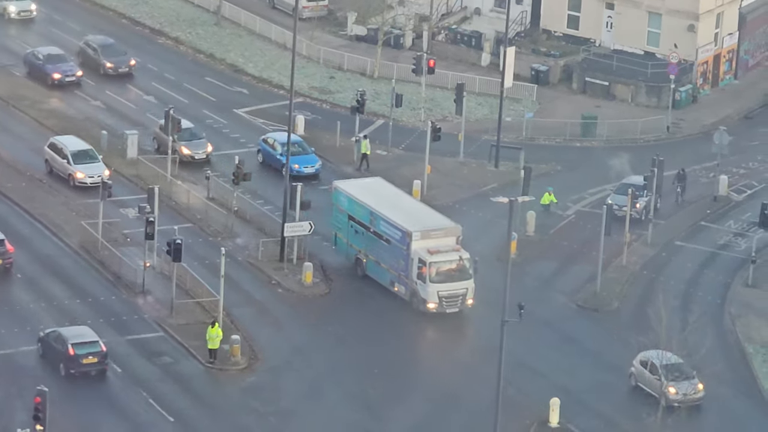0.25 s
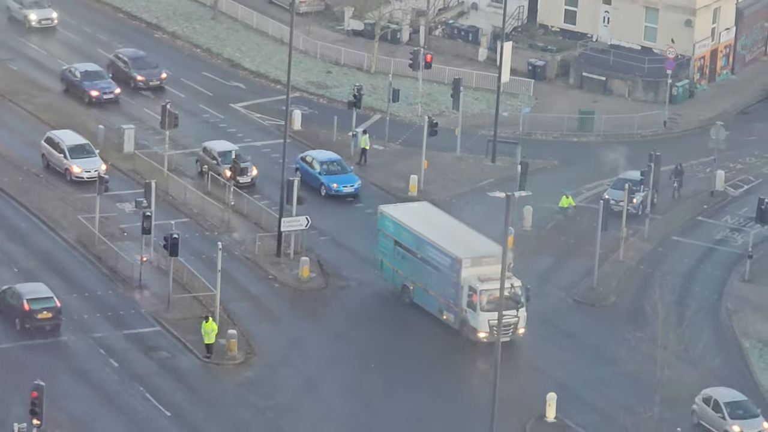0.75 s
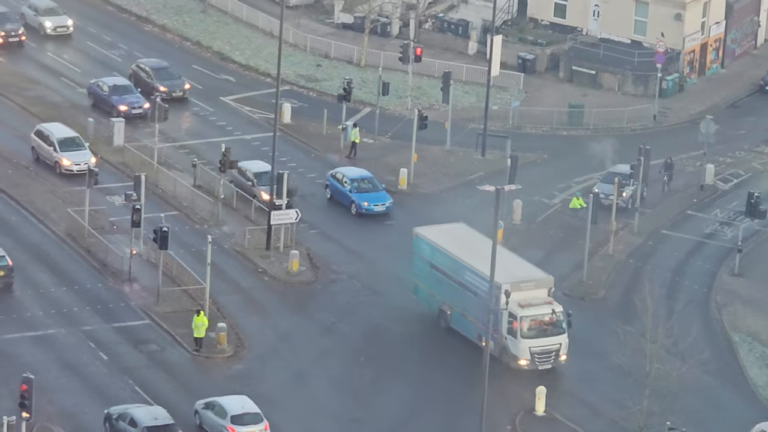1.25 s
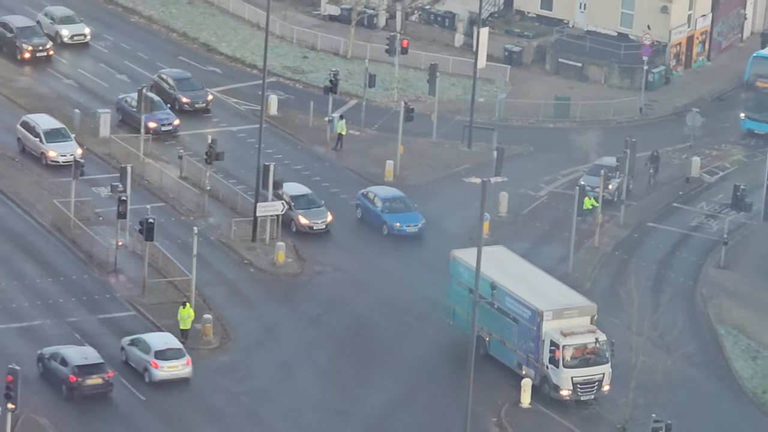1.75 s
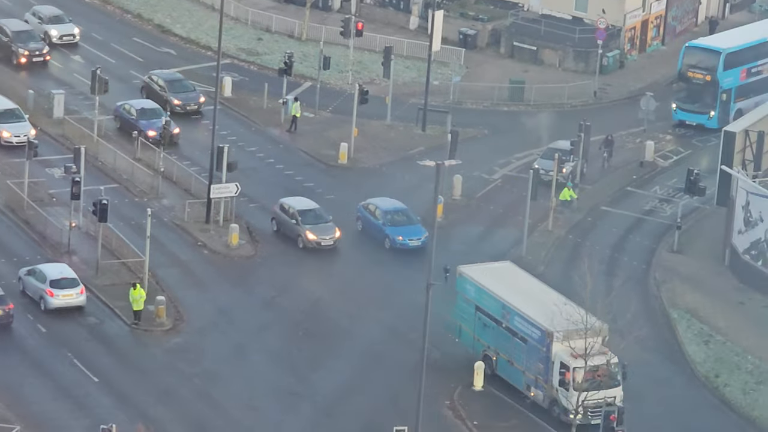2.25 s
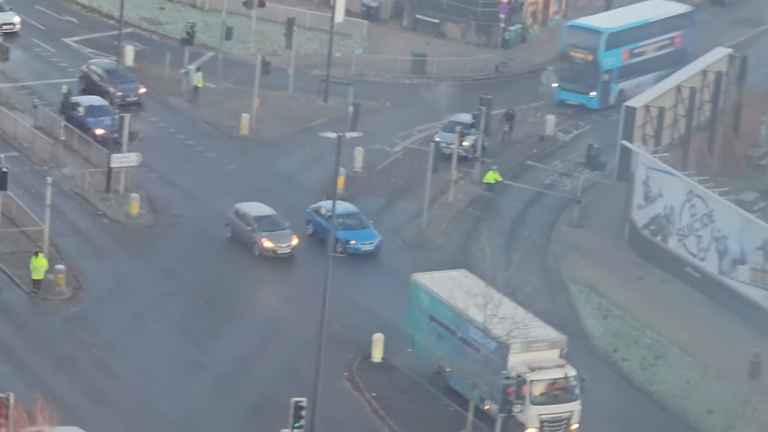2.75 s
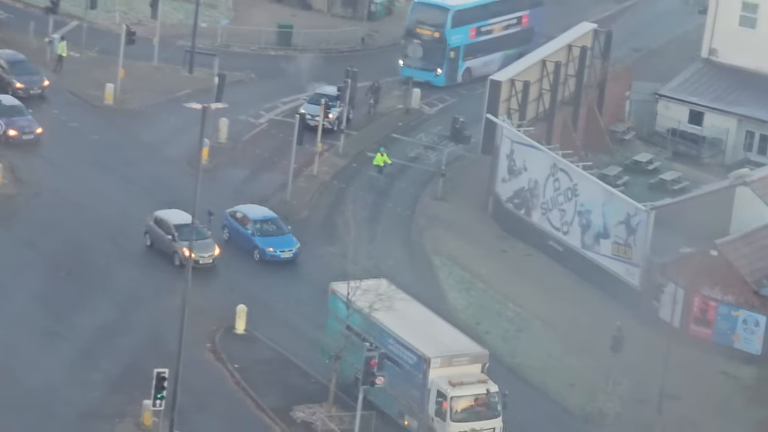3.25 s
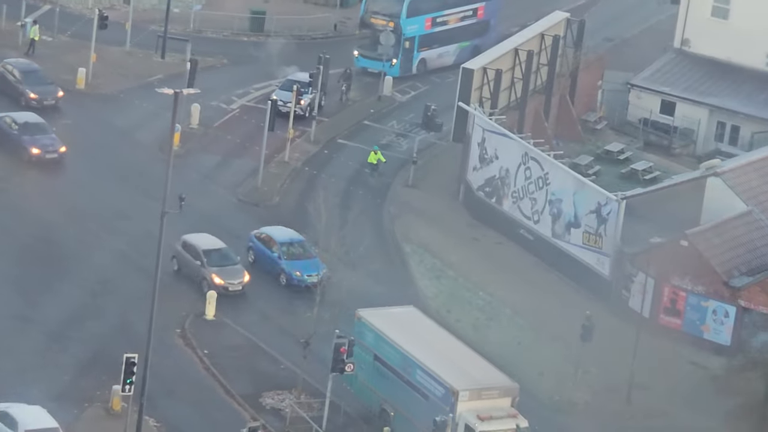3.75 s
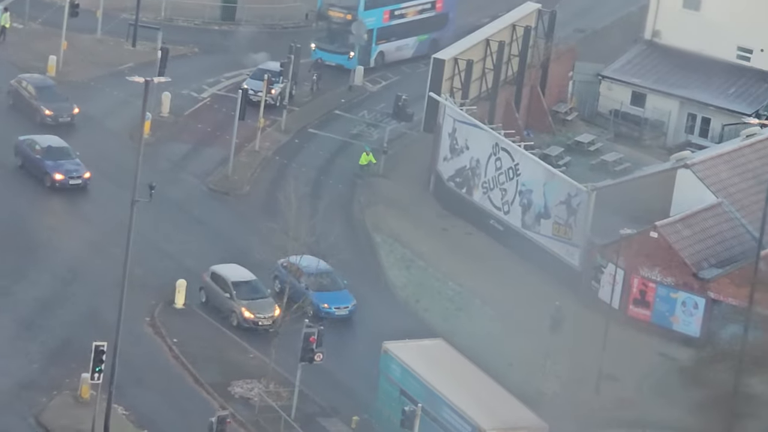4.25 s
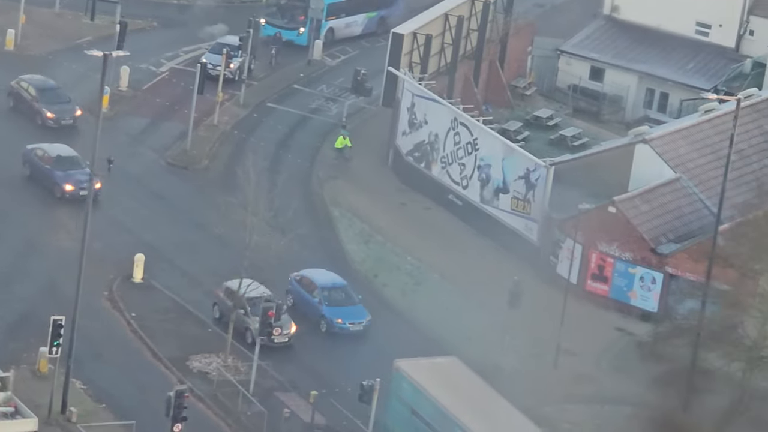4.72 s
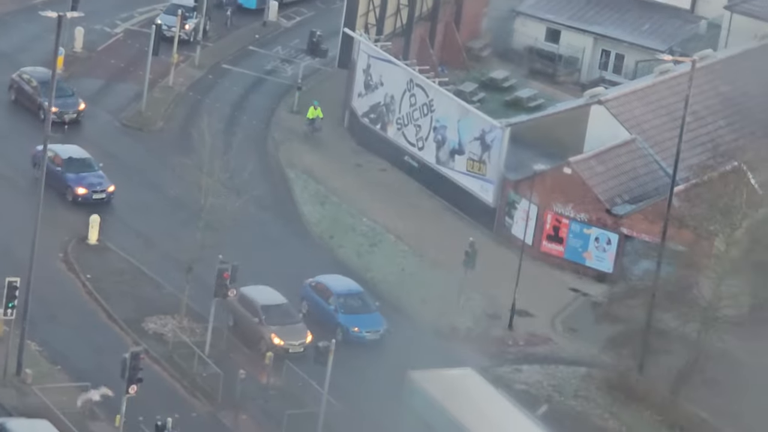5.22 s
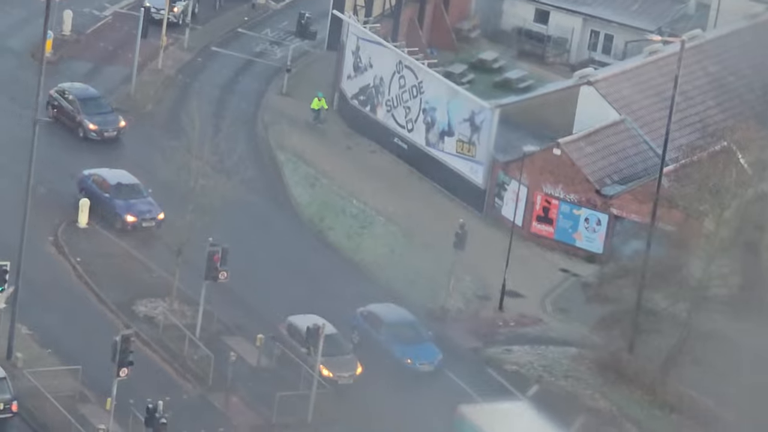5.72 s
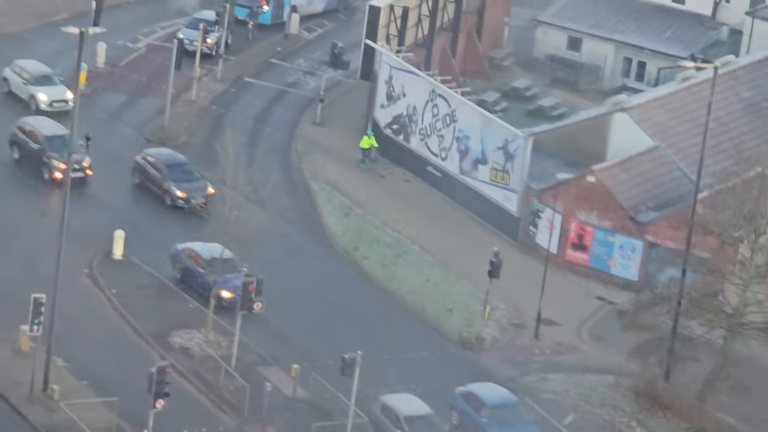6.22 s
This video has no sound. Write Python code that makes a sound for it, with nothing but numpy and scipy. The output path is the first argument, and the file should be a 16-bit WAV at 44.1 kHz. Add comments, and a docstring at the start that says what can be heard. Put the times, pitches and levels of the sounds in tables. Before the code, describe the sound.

Distant traffic heard from high up: lorry and car engines throb low beneath muffled road roar, with faint brake squeaks and tiny bird chirps.

```python
"""A deep rumble of beating diesels under a steady, dull tyre roar: a busy road junction on a damp day.
Two microphones hear it from high up and some way off; one engine swells to a drone near the end.
Engines are sums of sines on wandering firing rates; roar, rumble and hiss are shaped noise.
Far above the roar a brake squeals thinly and a small bird chirps, both as gliding or wavering sines
with echoes from the house fronts."""
import sys
import numpy as np
from scipy import signal
from scipy.fft import rfft, irfft
from scipy.io import wavfile
from scipy.ndimage import uniform_filter1d

SR = 44100
rng = np.random.default_rng(int(sys.argv[2]) if len(sys.argv) > 2 else 0)


def transcribe(u):
    """Save the signal u as a 16-bit wav file named by the first command-line argument.

    u: samples, shape (n,) or (channels, n), limited to [-1, 1]; the rate is SR.
    q: integer samples, one column per channel.
    """
    v = np.clip(np.atleast_2d(u).T, -1, 1)
    q = np.round(v * 32767).astype(np.int16)
    wavfile.write(sys.argv[1], SR, q)


N = 285768

# A diesel crossing the junction: (time [s], firing rate before wander [Hz])
DIESEL_FIRING = [(0, 45.6), (.45, 45.2), (.85, 43.4), (1.15, 45.14), (2.2, 44.32), (2.7, 45.69),
                 (3.7, 45.93), (4.2, 48.23), (4.9, 47.1), (5.6, 44.07), (6.48, 44.07)]
# Its exhaust note: (time [s], level [dB])
DIESEL_EXHAUST = [(0, -29), (.17, -22.5), (.3, -29), (.39, -21), (.48, -23), (.55, -40), (.64, -21.5),
                  (.7, -44), (.76, -24), (.87, -19.5), (.97, -42), (1.04, -23), (1.12, -19), (1.34, -42),
                  (1.43, -22), (1.52, -30), (1.6, -34), (1.66, -21), (1.75, -27.5), (1.85, -42),
                  (1.93, -27), (2.02, -39), (2.09, -20.5), (2.22, -22.5), (2.35, -31), (2.4, -20.5),
                  (2.46, -36), (2.55, -23.5), (2.64, -20), (2.86, -28), (2.93, -32), (3.04, -25.5),
                  (3.17, -25), (3.3, -34), (3.39, -25.5), (3.44, -49), (3.5, -22), (3.62, -26.5),
                  (3.82, -22.5), (3.89, -34), (4.0, -29.5), (4.06, -22.5), (4.12, -38), (4.21, -28),
                  (4.3, -51), (4.37, -29), (4.64, -29), (4.77, -42), (4.97, -25.5), (5.03, -52.5)]
# A second diesel runs a little slower and beats against it
RIVAL_DB, BEAT_HZ, BEAT_WANDER_HZ = -45, 2.9, 1.41

# The lorry gathers speed, then lifts off: (time [s], firing rate before wander [Hz], relative level [dB])
LORRY_REVS = [(0, 37.16, 3), (.6, 37.33, 0.5), (1.5, 38.29, -1.5), (2.2, 39.57, -1.5), (2.6, 41.58, -0.5),
              (3.3, 42.1, -7), (3.9, 42.97, -6), (4.2, 42.15, -9), (5, 39.57, -9), (6.48, 38.8, -6.5)]
# The lorry's engine orders: (multiple of the firing rate [-], relative level [dB])
LORRY_ORDERS = [(4, -50), (6, -43), (7, -42), (8, -53.5), (12, -49.5), (13, -48), (14, -47), (16, -47),
                (18, -54), (20, -51), (21, -48.5), (31, -52.5), (33, -50.5), (35, -54), (36, -55),
                (49, -60)]
# Its exhaust booms in uneven surges at twice the firing rate: (time [s], relative level [dB])
LORRY_BOOM = [(0, -27), (.15, -35), (.26, -23), (.34, -32), (.42, -24), (.5, -14), (.57, -29), (.62, -34),
              (.7, -21), (.79, -24), (.9, -32), (.98, -38), (1.1, -22), (1.26, -30.5), (1.42, -25),
              (1.56, -25.5), (1.68, -33), (1.8, -40), (1.89, -24.5), (2.17, -40), (2.26, -19), (2.38, -42),
              (2.5, -43), (2.59, -22), (2.7, -28), (2.78, -37), (2.85, -26), (2.93, -36), (3.0, -26),
              (3.11, -31), (3.3, -40), (5, -42), (6.48, -37)]

# Rumble of the other engines: (time [s], relative level [dB])
ENGINE_RUMBLE = [(0, -29), (.19, -33), (.26, -26), (.33, -31.5), (.5, -24), (.6, -37), (.7, -27.5),
                 (.84, -27.5), (.96, -36), (1.1, -27), (1.2, -35), (1.54, -30.5), (1.79, -35), (1.9, -31),
                 (2.15, -42), (2.28, -26), (2.45, -42), (2.58, -27), (2.8, -30), (2.92, -33), (3.0, -26),
                 (3.15, -32.5), (3.24, -27.5), (3.45, -33.5), (3.68, -32), (3.82, -24), (3.89, -32),
                 (4.25, -35), (4.64, -27.5), (4.75, -36), (4.88, -29), (5.03, -35.5), (5.09, -26.5),
                 (5.2, -32.5), (6.48, -34.5)]
# Drone of engine bodies: (time [s], level [dB])
BODY_DRONE = [(0, -32), (1.1, -33.5), (1.8, -33.5), (2.55, -33), (2.85, -37.5), (3.35, -32), (3.7, -35.5),
              (4.05, -34), (4.7, -37.5), (5.2, -34), (6.0, -33.5), (6.48, -36.5)]
# An engine held at higher revs: (time [s], relative level [dB])
ENGINE_HUM = [(0, -42), (.23, -30.5), (.33, -39), (.49, -36), (.6, -33), (.75, -33), (.9, -32.5),
              (1.0, -43), (1.14, -40), (1.23, -23.5), (1.34, -47), (1.57, -30.5), (1.75, -51), (2.2, -56),
              (2.34, -38), (2.45, -37), (2.62, -28.5), (2.72, -42), (3.0, -54), (3.15, -32), (3.3, -44),
              (3.42, -40), (3.62, -32.5), (3.76, -48), (3.9, -34), (4.07, -29.5), (4.26, -40),
              (4.52, -33.5), (4.82, -39.5), (5.16, -36.5), (5.34, -45), (5.48, -37), (5.7, -48),
              (6.07, -33), (6.48, -53)]
HUM_HZ = 124.5  # centre of its wander

# Noise spectrum of the engine rumble: (frequency [Hz], relative density [dB per Hz])
RUMBLE_SPECTRUM = [(12, -35.5), (22, -21), (32, -2.5), (45, -10), (60, 2.5), (76, 0.5), (90, -4.5),
                   (104, -7.5), (125, -18), (170, -34)]
# Noise spectrum of the engine drone: (frequency [Hz], relative density [dB per Hz])
DRONE_SPECTRUM = [(85, -13), (115, -1.5), (135, 2.5), (160, -3.5), (176, -9), (200, -0.5), (220, -3),
                  (240, 1), (256, 1), (275, 2.5), (300, -3), (325, -5.5), (350, -17), (450, -30)]
# Noise spectrum of the tyre roar: (frequency [Hz], relative density [dB per Hz])
ROAR_SPECTRUM = [(200, -19.5), (340, -10), (420, -5), (465, 0), (560, 2), (800, -1), (920, -3), (1200, -1),
                 (1400, -1), (1520, -4.5), (1750, -9), (2330, -15), (2450, -26), (3400, -50)]
# Noise spectrum of the tread hiss: (frequency [Hz], relative density [dB per Hz])
TREAD_SPECTRUM = [(1900, -14.5), (2300, 0.5), (2450, 5.5), (2750, 4), (3150, -4), (3600, -3.5),
                  (4100, -7.5), (4650, -9.5), (4850, -21), (5600, -41.5)]
# Noise spectrum of the faint high hiss: (frequency [Hz], relative density [dB per Hz])
HISS_SPECTRUM = [(3500, -7.5), (5000, 6), (5700, 2.5), (6600, 1), (8300, -2.5), (9200, -1.5), (10200, -8.5),
                 (11600, -2.5), (12600, -8.5), (15500, -5)]
# Noise spectrum of the soft rustles: (frequency [Hz], relative density [dB per Hz])
RUSTLE_SPECTRUM = [(4000, -5), (6500, 2.5), (9000, -5), (10500, -6), (12000, 0), (14500, -4), (15500, -12)]

# Reflections from the buildings colour the noise: (frequency [Hz], width [Hz], boost or cut [dB])
BUILDING_COLOUR = [(468, 17, 1.5), (495, 16, -2.5), (593, 49, -6), (813, 65, 2), (1106, 46, -4),
                   (1137, 50, 1.5), (1292, 43, -3.5), (1348, 85, 2.5), (1830, 61, -1), (1947, 127, 5.8),
                   (2500, 55, 1.5), (2940, 89, 2.5), (3230, 140, -1.5), (3600, 130, 3), (4520, 45, 3.5)]
# How alike the two microphones hear the street: (frequency [Hz], left-right correlation [-1 to 1])
MIC_LIKENESS = [(30, 0.99), (130, 0.94), (280, 0.99), (420, 0.83), (700, 0.71), (950, 0.42), (1200, 0.26),
                (1400, 0.22), (1560, -0.4), (1750, 0.28), (1950, 0.65), (2300, 0.42), (2700, .2),
                (3300, -0.026)]
# Lean of the street to one side: (frequency [Hz], left minus right level [dB])
STREET_LEAN = [(50, 2.5), (130, -0.5), (270, 0.1), (420, 0), (560, 3.5), (750, 1), (1200, 1.8), (1550, 2.5),
               (1950, 2.5), (2300, 1.2), (3800, 1.5), (4700, 3), (8000, -0.5)]
# Echoes off the road and passing bodywork: (delay before sway [ms], level [dB])
ECHO_PATHS = [(2.6, -13), (5.3, -12), (8.9, -15)]

# Tyre roar and tread hiss: level at the start before surges, then a slow fall as the traffic draws away
ROAR_DB, ROAR_FALL_DB_PER_S = -31.0, 0.19
TREAD_DB, TREAD_FALL_DB_PER_S = -54.5, 0.19
# The roar swells gently as the nearest vehicles pass: moment of the peak, spread, rise
PASS_S, PASS_LENGTH_S, PASS_RISE_DB = 2.44, 0.75, 0.84

# Faint high hiss: (time [s], level [dB])
HISS_LEVEL = [(0, -75), (2.6, -73), (4.6, -76.5), (6.48, -74.5)]
# Soft rustles: (start [s], length [s], peak level [dB])
RUSTLE_TIMES = [(.88, 0.13, -70), (1.14, .05, -75), (1.23, 0.07, -71), (1.437, 0.075, -71.5),
                (2.567, 0.068, -74), (6.145, .03, -75)]

# Brake squeal: (start [s], length [s], level before flicker [dB], pitch [Hz], waver [Hz])
BRAKE_SQUEALS = [(0, .25, -79, 9420, 75), (0.347, 0.11, -68.5, 9440, 60), (0.515, 0.14, -69.5, 9440, 60),
                 (0.82, 0.29, -72.5, 9400, 75.63), (1.091, .16, -79, 9400, 149),
                 (2.16, 0.56, -84, 9150, 380), (3.178, 0.13, -66.5, 9400, 95),
                 (3.297, 0.14, -72, 9500, 125), (4.294, 0.08, -80, 9520, 75)]
# Bird chirps: (start [s], length [s], start pitch [Hz], middle pitch [Hz], end pitch [Hz],
# peak level before flutter [dB], warble [share of pitch], loudest moment [share of length])
BIRD_CHIRPS = [(0.055, .04, 6600, 6520, 6450, -75, .002, .3),
               (.475, 0.051, 6600, 6500, 6480, -70, .002, .6),
               (0.905, 0.14, 7240, 6700, 6700, -64, 0.007, .85),
               (1.088, 0.043, 7000, 7350, 7200, -69, .012, .5),
               (1.105, 0.1, 7000, 6430, 6500, -61.5, 0.03, 0.72),
               (1.245, .04, 6900, 7350, 7050, -67, .018, .5),
               (1.28, 0.065, 7100, 6900, 6650, -66, .012, .8),
               (1.355, 0.065, 11600, 11700, 11850, -71, .006, .6),
               (2.88, 0.23, 5600, 4830, 4720, -63.5, 0.015, 0.52),
               (3.185, 0.15, 5700, 4900, 4200, -60.5, .02, 0.68),
               (3.496, 0.075, 4840, 4540, 4425, -51.5, 0.012, .3),
               (5.755, 0.088, 8267, 7610, 7400, -61.5, 0.0056, 0.82),
               (5.92, 0.092, 8000, 6700, 6100, -63.5, 0.13, 0.98),
               (6.254, 0.082, 7900, 6900, 6200, -66.5, 0.13, .68),
               (6.433, 0.052, 4300, 4570, 4580, -56, 0.0055, 0.54)]
BIRD_FLUTTER_DB = 4.0

# A heavy diesel opens up, holds, then eases off while its revs creep up
PULL_START_S, PULL_ATTACK_S, PULL_HOLD_S = 5.03, 0.095, 0.644
PULL_DB, PULL_EASE_DB_PER_S = -18.5, 7.5
PULL_HZ, PULL_RISE_HZ_PER_S = 47.5, 0.3
# As it eases it throbs against a neighbour: beat rate, depth (share), time to build up
THROB_HZ, THROB_DEPTH, THROB_BUILD_S = 4.89, 0.66, 0.08

CUTOFF_HZ = 15700


def from_db(db):
    """Turn decibels into gain."""
    return 10 ** (np.asarray(db) / 20)


def rms_one(x):
    """Scale to unit power."""
    return x / np.sqrt(np.mean(x ** 2) + 1e-20)


def in_time(rows):
    """Draw each column of a time curve at every sample."""
    times, *columns = np.transpose(rows)
    return [np.interp(np.arange(N) / SR, times, column) for column in columns]


def at_hz(points, hz):
    """Read a table on a log-frequency axis."""
    table_hz, value = np.transpose(points)
    return np.interp(np.log(hz + 1e-6), np.log(table_hz), value)


def drift(bandwidth_hz):
    """Low-passed chance of unit power, computed at every 40th sample and joined by straight lines."""
    step = 40
    pole = np.exp(-2 * np.pi * bandwidth_hz * step / SR)
    chance = rng.standard_normal(N // step + 2002)
    slow = signal.lfilter([1], [1, -2 * pole, pole * pole], chance)[2000:]  # drop the settling
    return np.interp(np.arange(N) / step, np.arange(len(slow)), rms_one(slow))


def turn(hz):
    """Running phase of a changing frequency."""
    return 2 * np.pi * np.cumsum(hz) / SR


def panned(x, lean_db):
    """Place a sound across the two microphones by level; a positive lean is to the left."""
    return x * from_db(np.array([[1], [-1]]) * lean_db / 2)


def swell(start_s, length_s, db):
    """A half-sine rise and fall of gain."""
    along = np.clip((np.arange(N) / SR - start_s) / length_s, 0, 1)
    return from_db(db) * np.sin(np.pi * along)


def street_noise(spectrum, lag_ms=0.099):
    """Noise from a wide street at two microphones, their likeness varying with frequency."""
    hz = np.arange(N // 2 + 1) * SR / N
    colour_db = sum(db * np.exp(-2 * ((hz - f) / width) ** 2) for f, width, db in BUILDING_COLOUR)
    level_db = at_hz(spectrum, hz) + colour_db
    low_hz, high_hz = spectrum[0][0], spectrum[-1][0]
    skirts = 1 / (1 + (hz / high_hz) ** 12) / (1 + (low_hz / (hz + 1)) ** 6)

    # Shared and opposed noise are mixed to give the wanted correlation
    alike = np.clip(at_hz(MIC_LIKENESS, hz), -.99, .99)
    mid, side = rfft(rng.standard_normal((2, N)))
    pair = np.sqrt(1 + alike) * mid + np.sqrt(1 - alike) * side * [[1], [-1]]
    pair = panned(pair, at_hz(STREET_LEAN, hz))

    # The left microphone hears the bass slightly earlier
    lead_s = lag_ms / 1000 / (1 + (hz / 900) ** 4)
    pair[0] *= np.exp(2j * np.pi * hz * lead_s)
    out = irfft(pair * from_db(level_db) * skirts, N)
    return out / np.std(out.mean(axis=0))


def evened(x, window_s):
    """Hold a noise at a steady level, so that its swells come from the traffic."""
    power = uniform_filter1d(x.mean(axis=0) ** 2, max(int(window_s * SR), 2))
    return x / np.sqrt(np.abs(power) + 1e-9)


def shifting_echoes(x, sway_ms=0.611, sway_bandwidth_hz=1.11):
    """Vehicles move, so echo paths lengthen and shorten and ripples wander through the noise."""
    n, out = np.arange(N), x
    for delay_ms, db in ECHO_PATHS:
        then = n - (delay_ms + sway_ms * drift(sway_bandwidth_hz)) * SR / 1000
        echo = np.array([np.interp(then, n, ear, left=0, right=0) for ear in x])
        out = out + from_db(db) * echo
    return out / np.std(out.mean(axis=0))


def receding(start_db, fall_db_per_s):
    """Gain of a source that draws steadily away."""
    return from_db(start_db - fall_db_per_s * np.arange(N) / SR)


def diesel(wander_hz=1.74, second_db=-24):
    """The firing note and its second harmonic waver and beat against a second exhaust."""
    (firing_hz,), (exhaust_db,) = in_time(DIESEL_FIRING), in_time(DIESEL_EXHAUST)
    phase = turn(firing_hz + wander_hz * drift(4.76))
    note = rms_one(np.sin(phase) + from_db(second_db) * np.sin(2 * phase))
    beat_hz = BEAT_HZ + BEAT_WANDER_HZ * drift(2.36)
    rival = rms_one(np.sin(phase - turn(beat_hz)))
    both = note * from_db(exhaust_db) + rival * from_db(RIVAL_DB)
    return panned(both, at_hz(STREET_LEAN, np.mean(firing_hz)))


def lorry(wander=0.004954, fading_db=3.5, blur_rad=0.71, boom_db=-4.0):
    """Engine orders climb with the revs, then drop, each fading as paths shift; the exhaust booms."""
    (firing_hz, load_db), (exhaust_db,) = in_time(LORRY_REVS), in_time(LORRY_BOOM)
    phase = turn(firing_hz * (1 + wander * drift(1.5)))
    out = np.zeros((2, N))
    for order, db in LORRY_ORDERS:
        # The less alike the microphones at this pitch, the further out of step they may hear it
        alike = np.clip(at_hz(MIC_LIKENESS, order * firing_hz.mean()), -1, 1)
        apart = np.arccos(alike) * rng.normal() / 2
        angle = order * phase + blur_rad * drift(5.7)
        fading = rms_one(from_db(fading_db * np.tanh(drift(12.0))))
        size = fading * from_db(db) * np.sqrt(2)
        out += size * np.sin([angle + apart, angle - apart])
    boom_angle = 2 * phase + blur_rad * drift(4.0)
    boom = np.sqrt(2) * np.sin(boom_angle) * from_db(exhaust_db + boom_db)
    return panned(out * from_db(load_db) + boom, lean_db=1.8)


def other_engines(rumble_db=1.5, hum_db=-1.0, hum_wander_hz=3.506, hum_fade_db=3.5):
    """Many engines blur into noise, a rumble and a drone; one hum stands out, fading in and out."""
    (low_db,), (revs_db,), (body_db,) = in_time(ENGINE_RUMBLE), in_time(ENGINE_HUM), in_time(BODY_DRONE)
    rumble = evened(street_noise(RUMBLE_SPECTRUM), window_s=0.1) * from_db(low_db + rumble_db)
    drone = evened(street_noise(DRONE_SPECTRUM), window_s=0.27) * from_db(body_db)
    fading = from_db(hum_fade_db * np.tanh(drift(4.2)))
    hum_tone = np.sin(turn(HUM_HZ + hum_wander_hz * drift(8)))
    hum = rms_one(hum_tone * fading) * from_db(revs_db + hum_db)
    return rumble + drone + panned(hum, lean_db=2.5)


def tyres(surge_db=0.5, surge_bandwidth_hz=7.1, flutter_db=1.0):
    """Tyre noise on damp tarmac swells, surges and draws away; distance takes most of the treble."""
    passing_db = PASS_RISE_DB * np.exp(-((np.arange(N) / SR - PASS_S) / PASS_LENGTH_S) ** 2)
    surge = from_db(passing_db + surge_db * drift(surge_bandwidth_hz))
    roar = shifting_echoes(street_noise(ROAR_SPECTRUM)) * receding(ROAR_DB, ROAR_FALL_DB_PER_S)
    tread = shifting_echoes(street_noise(TREAD_SPECTRUM)) * receding(TREAD_DB, TREAD_FALL_DB_PER_S)
    flutter = from_db(flutter_db * drift(25))
    return surge * (roar + tread * flutter)


def hiss():
    """A faint bright noise floor with a few soft rustles on it."""
    floor_db, = in_time(HISS_LEVEL)
    floor = street_noise(HISS_SPECTRUM) * from_db(floor_db)
    rustles = street_noise(RUSTLE_SPECTRUM) * sum(swell(*row) for row in RUSTLE_TIMES)
    return floor + rustles


def brake(edge_s=0.018, flicker_db=4.0):
    """One high mode sings while the pad drags; the wider its pitch wavers, the more it rasps."""
    t, out, waver = np.arange(N) / SR, np.zeros(N), drift(350)
    for start_s, length_s, db, hz, waver_hz in BRAKE_SQUEALS:
        grip = np.clip(np.minimum(t - start_s, start_s + length_s - t) / edge_s, 0, 1)
        tone = np.sqrt(2) * np.sin(turn(hz + waver_hz * waver))
        out += from_db(db) * grip * tone
    return out * rms_one(from_db(flicker_db * np.tanh(drift(30))))


def bird(flutter_bandwidth_hz=60):
    """Thin gliding whistles, mostly falling, that swell to a peak, flutter and warble."""
    t, out, shake = np.arange(N) / SR, np.zeros(N), np.tanh(drift(230))
    for start_s, length_s, start_hz, middle_hz, end_hz, db, warble, peak in BIRD_CHIRPS:
        on = (t > start_s) & (t < start_s + length_s)
        along = (t[on] - start_s) / length_s
        glide_hz = np.interp(along, [0, .5, 1], [start_hz, middle_hz, end_hz])
        pitch_hz = glide_hz * (1 + warble * shake[on])
        loudness = np.interp(along, [0, np.clip(peak, .1, .9), 1], [0, 1, 0])
        out[on] += from_db(db) * loudness * np.sin(turn(pitch_hz))
    return out * from_db(BIRD_FLUTTER_DB * np.tanh(drift(flutter_bandwidth_hz)))


def facades(x, echo_db=-13, t60_s=0.55, count=14):
    """House fronts return a scatter of echoes, weaker when later and different at each microphone."""
    out = np.array([x, x])
    for ear, delays_s in enumerate(rng.uniform(.004, 0.068, (2, count))):
        for delay_s in delays_s:
            lag = int(delay_s * SR) + 1
            out[ear, lag:] += from_db(echo_db - 60 * delay_s / t60_s) * x[:-lag]
    return out


def pulling_diesel(wander_hz=0.34, second_db=-28, flutter_db=0.9):
    """One engine under load: a nearly pure drone that starts to throb as it eases off."""
    since = np.arange(N) / SR - PULL_START_S
    easing = np.maximum(since - PULL_HOLD_S, 0)
    load = np.clip(since / PULL_ATTACK_S, 0, 1) * from_db(PULL_DB - PULL_EASE_DB_PER_S * easing)
    load = load * from_db(flutter_db * drift(10))
    phase = turn(PULL_HZ + PULL_RISE_HZ_PER_S * since + wander_hz * drift(4.4))
    note = np.sin(phase) + from_db(second_db) * np.sin(2 * phase)
    depth = THROB_DEPTH * np.minimum(easing / THROB_BUILD_S, 1)
    neighbour = depth * np.sin(phase - 2 * np.pi * THROB_HZ * easing)
    even_power = np.sqrt(2 / (1 + depth ** 2))
    return panned(load * (note + neighbour) * even_power, lean_db=2.6)


def scene():
    """Engines and tyres, with the small high sounds above them."""
    engines = diesel() + lorry() + other_engines() + pulling_diesel()
    high_sounds = panned(facades(brake() + bird()), lean_db=4.0)
    return engines + tyres() + hiss() + high_sounds


def record(dry):
    """A steep low-pass cuts the top of both microphone signals."""
    low_pass = signal.ellip(10, .1, 80, CUTOFF_HZ, fs=SR, output="sos")  # ripple and stopband in dB
    return signal.sosfilt(low_pass, dry)


dry = scene()
out = record(dry)
transcribe(out)
```